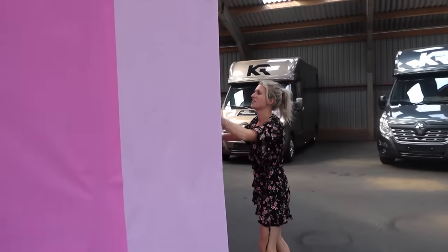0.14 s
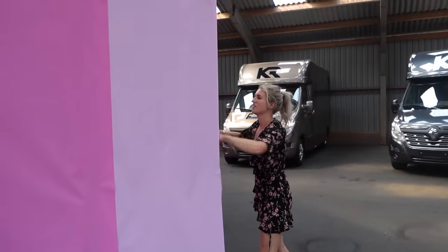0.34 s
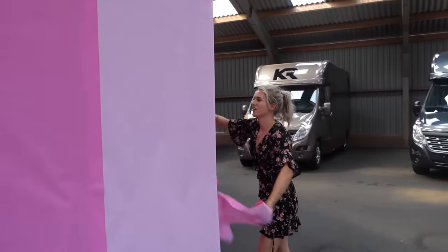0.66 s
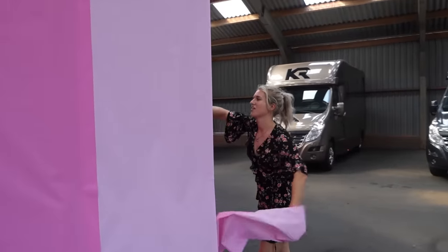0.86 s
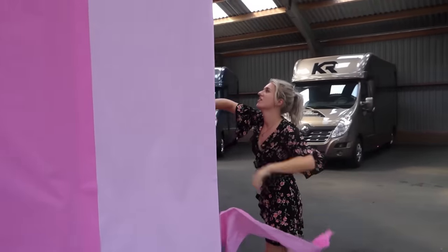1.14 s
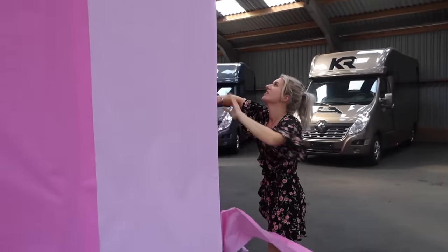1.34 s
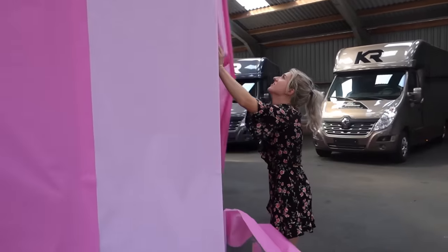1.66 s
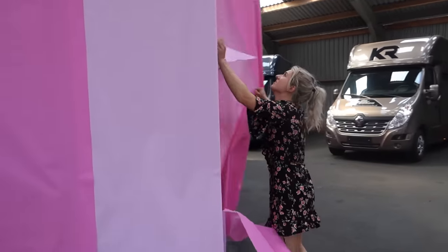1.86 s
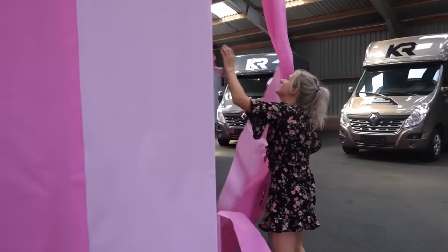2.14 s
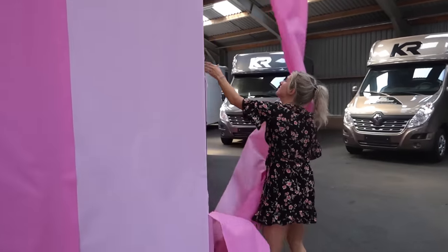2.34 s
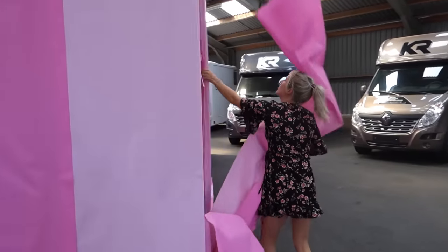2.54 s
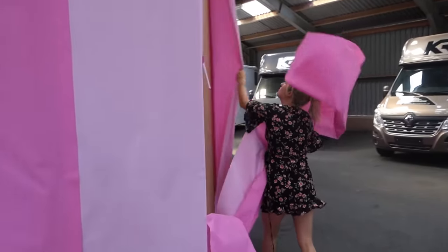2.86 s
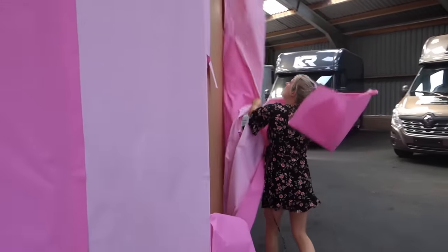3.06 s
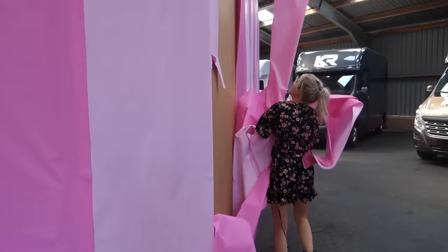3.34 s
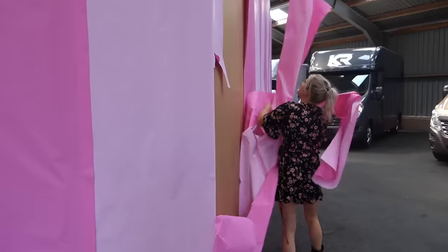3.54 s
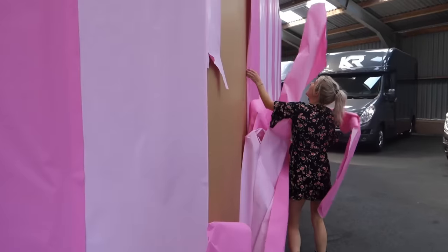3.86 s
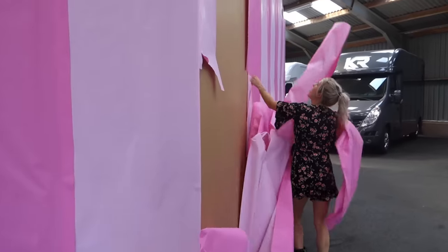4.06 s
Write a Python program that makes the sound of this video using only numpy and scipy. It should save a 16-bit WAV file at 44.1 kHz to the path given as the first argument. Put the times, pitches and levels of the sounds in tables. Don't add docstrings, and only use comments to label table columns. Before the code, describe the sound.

The sound opens in the middle of a strong tear, a dense crackle of parting paper fibres with rattling sheet, loudest until about 0.4 s. It drops to a soft rustle near 0.7 s with small snaps, then rebuilds through crackling creases and a hard pop at 0.95 s into a broad rip around 1.05-1.2 s. It eases by 1.55 s. Snaps lead to another long rip at 1.8-2.15 s, with a loud pop at 1.83 s. A quieter moment near 2.55 s gives way to short jerky tears and a firm pop at 2.65-2.9 s, then a rip at 3.1 s. Loose paper flaps dully around 3.4-3.6 s. From 3.6 s quick bright rips and snaps return, with a sharp high pop at 3.94 s, staying busy to the end. Treble leans right; a large shed adds a dull reverberant wash over a very faint low hum.

```python
import sys
import numpy as np
from scipy import signal
from scipy.fft import rfft, irfft, next_fast_len
from scipy.io import wavfile
from scipy.ndimage import uniform_filter1d, minimum_filter1d, map_coordinates

SR = 44100
rng = np.random.default_rng(int(sys.argv[2]) if len(sys.argv) > 2 else 0)


def dump(signal):
    limited = np.clip(np.atleast_2d(signal).T, -1, 1)
    pcm = np.round(limited * 32767).astype(np.int16)
    wavfile.write(sys.argv[1], SR, pcm)


def rack_gain(trim_db):
    fader = np.asarray(trim_db, float)
    return 10 ** (fader / 20)


N = 185264


def unit(x):
    return x / np.sqrt(np.mean(x ** 2) + 1e-20)


def along(points, hz):
    f, v = np.transpose(points)
    return np.interp(np.log(hz + 1), np.log(f + 1), v)


def curves(rows):
    s, *columns = np.transpose(rows)
    t = np.arange(N) / SR
    return [np.interp(t, s, column) for column in columns]


def wobble(rate):
    knots = rng.standard_normal(int(N * rate / SR) + 4)
    return map_coordinates(knots, [np.arange(N) * rate / SR])


def filtered(x, response):
    m = next_fast_len(N + SR // 2)
    return irfft(rfft(x, m) * response(np.fft.rfftfreq(m, 1 / SR)), m)[..., :N]


def coloured(x, spectrum):
    norm = np.sqrt(np.mean(rack_gain(along(spectrum, np.linspace(0, SR / 2, 4000))) ** 2))
    return filtered(x, lambda hz: rack_gain(along(spectrum, hz)) / norm)


def clicks(rate, spread_db, life_ms):
    chance, size = rng.random(N), rng.exponential(size=N)
    blows = (chance < rate / SR) * rack_gain(spread_db * np.minimum(size, 5)) ** 2
    fade = np.exp(-1000 / (np.maximum(life_ms, .02) * SR))
    energy = signal.lfilter([1], [1, -fade], blows)
    return unit(np.sqrt(energy + 1e-9) * rng.standard_normal((2, N)))


def patches(pair, patchy_db):
    z = signal.stft(pair, nperseg=256)[2]
    field = rng.standard_normal(z.shape[1:])
    field = uniform_filter1d(field, size=9, axis=0)
    field = uniform_filter1d(field, size=7, axis=1)
    return unit(signal.istft(z * rack_gain(patchy_db * unit(field)), nperseg=256)[1][:, :N])


# frequency in Hz, level in dB rms.
HUM = [(107, -67.5)]


def hum():
    t = np.arange(N) / SR
    drone = np.zeros(N)
    for hz, db in HUM:
        level = np.sqrt(2) * rack_gain(db + 2 * wobble(3.03))
        drone += level * np.sin(2 * np.pi * hz * t + 1.0 * wobble(10))
    return drone


# frequency in Hz, reverberation time (60 dB decay) in seconds.
SHED = [(200, 1.04), (2000, 1.59), (5000, 0.65), (12000, 0.67)]


def shed(x):
    heard = np.concatenate([x[0, SR:0:-1], x[0]])
    path = np.arange(len(heard)) * 24 // SR % 6
    hz, t, z = signal.stft(rng.standard_normal((6, 2, 3 * SR // 2)), SR, nperseg=256)
    decay = rack_gain(-60 * t / along(SHED, hz)[:, None])
    tails = signal.istft(z * decay, SR, nperseg=256)[1]
    tails = tails / np.linalg.norm(tails[0, 0])
    wet = 0
    for k, tail in enumerate(tails):
        wet = wet + signal.fftconvolve((heard * (path == k))[None], tail, axes=1)
    return wet[:, SR - 600:][:, :N]


# frequency in Hz, left-right likeness from 0 to 1.
ALIKE = [(30, .95), (60, .99), (130, .997), (290, .993), (640, .987), (1410, .89), (3100, .7), (6820, .46),
         (15000, .46)]
# frequency in Hz, left minus right in dB.
LEAN = [(60, 0), (380, 0), (700, -.5), (1290, -2), (2380, -4.5), (4400, -8.5), (8120, -5.4), (15000, -5.9)]


def ports(pair):
    def turn(hz):
        return np.arccos(np.clip(along(ALIKE, hz), -1, 1)) / 2

    mid, side = filtered(pair, lambda hz: [np.cos(turn(hz)), np.sin(turn(hz))])
    left_right = np.array([mid + side, mid - side])
    return filtered(left_right, lambda hz: rack_gain(along(LEAN, hz) * [[.5], [-.5]]))


# time in seconds, effort in dB, brightness added by tension in dB,
# loose paper hanging in dB.
PULL = [(0, -19.5, 1, 0.5), (.22, -16, 1, 3), (.39, -21.5, 3.5, -0.5), (.68, -31, 0.5, 3), (.8, -20, 3, -1),
        (1.1, -17.5, 3, -0.5), (1.55, -26.5, 1, -0.5), (1.72, -21.5, 3, -0.5), (1.95, -19, 3.5, -4),
        (2.23, -21.5, 2, -1), (2.58, -29, 0, 1), (2.98, -25, 2, -3), (3.08, -20, 4, 0), (3.25, -21, 3, 1),
        (3.38, -22.5, 0, 4), (3.57, -26.5, 0, 5), (3.7, -20, 4, -2), (4.2, -20.5, -1.5, -1.5)]
# frequency in Hz, level in dB per Hz.
FLAP = [(25, -40), (60, -41), (130, -28), (200, -13), (290, -4), (500, -3.5), (800, 4.5), (1500, -39)]


def flapping():
    effort_db, _, loose_db = curves(PULL)
    flap_db = -34.5 + effort_db - effort_db.mean() + loose_db
    flaps = unit(rack_gain(0.35 * wobble(6.07)) * clicks(600, spread_db=2.5, life_ms=6.5))
    return rack_gain(flap_db) * coloured(flaps, FLAP)


# frequency in Hz, level in dB per Hz.
RATTLE = [(200, -89), (500, -13.5), (900, -5), (1400, -1), (2000, -3.5), (3000, -11.5), (6000, -63)]
# frequency in Hz, level in dB per Hz.
TAUT = [(800, -53.5), (1700, -7.5), (2500, 0.5), (3500, -2.5), (5000, -7.5), (8000, -15.5), (16000, -53)]


def sheet(tear_db, tug):
    effort_db, taut_db, _ = curves(PULL)
    taut_db = taut_db + 0.12 * (np.maximum(tear_db, -40) + 28.5)
    slack = patches(clicks(2500, spread_db=2.0, life_ms=0.89), patchy_db=1.0)
    taut = patches(rack_gain(1.2 * tug) * clicks(2500, spread_db=-0.5, life_ms=0.3), patchy_db=1.0)
    both = coloured(slack, RATTLE) + coloured(rack_gain(taut_db - 1.4) * taut, TAUT)
    return rack_gain(effort_db - 1.53) * both


# time in seconds, peak in dB, pitch in Hz.
POPS = [
    (.9519, 7, 2300),
    (1.0070, 1.5, 2200),
    (1.8298, 7, 3600),
    (2.0296, 1.5, 2300),
    (2.6757, 4, 2000),
    (3.9392, 5, 8000),
    (4.031, 1, 5000),
]


def pops():
    out, t = np.zeros((2, N)), (np.arange(40) - 15) / SR
    for s, db, hz in POPS:
        crack = .15 * np.diff(rng.standard_normal(len(t) + 1))
        pulse = (np.sin(2 * np.pi * hz * t) + crack) * np.exp(-(t / .00025) ** 2)
        sides = rack_gain([[db + along(LEAN, hz)], [db]])
        out[:, round(s * SR):][:, :len(t)] += sides * pulse
    return out


# time in seconds, peak in dB, sharpness in dB.
SNAPS = [(0.594, -26.5, -19), (0.645, -22.5, -14), (0.682, -23, -18), (0.7243, -15, -11.5), (0.767, -24, 3),
         (0.786, -27, 4), (0.8111, -16, 0), (0.864, -18, 3), (0.9506, -12, -5), (1.5419, -18.5, 0),
         (1.6094, -29, -6), (1.6586, -22.5, 0), (1.693, -18.5, -9), (1.7114, -26, 2), (1.7364, -24, 2),
         (1.7589, -21, -4), (2.1094, -24, -5), (2.041, -18, 3), (2.4463, -24, -5), (2.631, -25, -18),
         (2.727, -20, 5), (2.74, -20, -10), (3.504, -21.5, -21), (3.603, -18, -9), (3.682, -15, 2),
         (3.815, -16, 18), (3.853, -21, 13), (3.9382, -13, 3), (4.029, -16, -3), (4.151, -10, 1)]
# time in seconds,
# peak in dB, sharpness in dB, length in ms.
RIPS = [(0.9148, -15.5, -6, 27), (1.7779, -18, -3, 25), (1.85, -16, -11, 32), (2.163, -21, 3, 8),
        (2.243, -25, 4, 4), (2.327, -23, 5, 3), (2.462, -30, 5, 3), (2.6484, -19, 5.5, 41),
        (2.813, -20, 10, 10), (2.86, -21, -13, 22), (3.0394, -25, 3, 47), (3.40, -21, -8, 6),
        (4.183, -22.5, -10, 15)]
# frequency in Hz, level in dB per Hz.
FOLD = [(2000, -14), (4500, -6.5), (7000, -1), (10000, -3.5), (14000, -22)]
# frequency in Hz, level in dB per Hz.
EDGE = [(5000, -47), (9500, -16), (12000, 7), (17000, -3)]


def snaps():
    runs, t = np.zeros((3, N + SR)), np.arange(SR // 10) / SR
    single = [(s, db, sharp_db, 5.6 * (1 - 0.034 * sharp_db)) for s, db, sharp_db in SNAPS]
    for s, db, sharp_db, ms in single + list(RIPS):
        body_db, fold_db, edge_db = -5.5 - 0.37 * sharp_db, -7.5, sharp_db - 8.5
        u = t / (max(ms, 1) / 1000)
        crack = 0.48 * np.exp(-t / 0.00041)
        run = (1 - np.exp(-t / 0.0016)) * (np.exp(-u ** 4) + crack)
        runs[:, round(s * SR):][:, :len(t)] += rack_gain(db + np.array([[body_db], [fold_db], [edge_db]])) * run
    grit = clicks(6180, spread_db=2.0, life_ms=0.15)
    return sum(coloured(run[:N] * grit, colour) for run, colour in zip(runs, (TAUT, FOLD, EDGE)))


# full speed from and until in seconds, level in dB,
# build-up in dB per second, run-out in dB per second.
STROKES = [(0, 0.362, -22, 100, 128), (0.694, 0.696, -34, 900, 698), (0.723, 0.723, -30, 900, 400),
           (0.807, .82, -34, 200, 205), (.92, 0.944, -30, 84, 102), (1.057, 1.2, -23.5, 47, 96),
           (1.673, 1.74, -33.5, 77, 100), (1.792, 1.795, -24.5, 400, 500), (1.858, 2.12, -23.5, 155, 77),
           (2.56, 2.57, -38, 900, 300), (2.63, 2.64, -29.5, 197, 304), (2.653, 2.68, -22, 500, 889),
           (2.74, 2.745, -25.5, 252, 196), (2.802, 2.857, -24.5, 127, 72), (3.058, 3.13, -22.5, 62, 53),
           (3.52, 3.57, -39, 100, 300), (3.595, 3.62, -29, 1200, 100), (3.64, 3.698, -21.5, 348, 50),
           (3.76, 3.927, -28, 150, 190), (4.0, 4.03, -26, 73, 398), (4.09, 4.132, -27.5, 94, 700)]


def tearing():
    t = np.arange(N) / SR
    power = rack_gain(-71) ** 2
    for start, end, db, rise, stop in STROKES:
        before, after = np.maximum(start - t, 0), np.maximum(t - end, 0)
        power = power + rack_gain(db - rise * before - stop * after) ** 2
    return 10 * np.log10(power)


# frequency in Hz, level in dB per Hz.
FIBRE = [(800, -56), (2000, 0), (4000, 1), (7000, -1.5), (11000, -4.5), (15500, -9), (17000, -2)]


def fibres(tear_db, tug):
    crackle = rack_gain(1.4 * tug) * clicks(2000, spread_db=-1, life_ms=1.0)
    return rack_gain(tear_db + 4.0) * coloured(patches(crackle, patchy_db=2.5), FIBRE)


def scene():
    tear_db = tearing()
    tug = wobble(40)
    near = flapping() + sheet(tear_db, tug) + snaps() + fibres(tear_db, tug)
    return ports(near + rack_gain(-5) * shed(near)) + hum() + pops()


def roll_off(x):
    return signal.sosfilt(signal.butter(12, 15750, fs=SR, output="sos"), x)


# frequency in Hz, gain in dB.
MIC = [(20, -15), (60, -8), (120, -2), (200, 0)]


def record(dry):
    need_db = np.minimum(0, 20 * np.log10(.97 / (np.abs(dry).max(axis=0) + 1e-9)))
    duck_db = uniform_filter1d(minimum_filter1d(need_db, size=200), size=60)
    fade = np.exp(-1 / (.005 * SR))
    duck_db = np.minimum(duck_db, signal.lfilter([1 - fade], [1, -fade], duck_db))
    mix = filtered(dry * rack_gain(duck_db), lambda hz: rack_gain(along(MIC, hz)) * (hz < 15750))
    return roll_off(mix)


dry = scene()
out = record(dry)
dump(out)
```